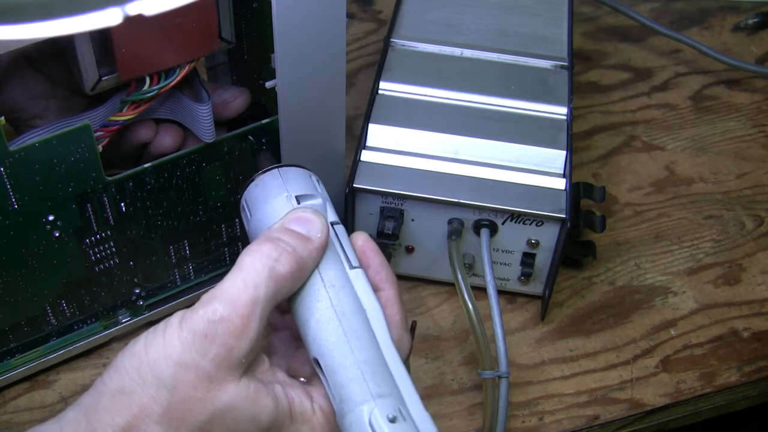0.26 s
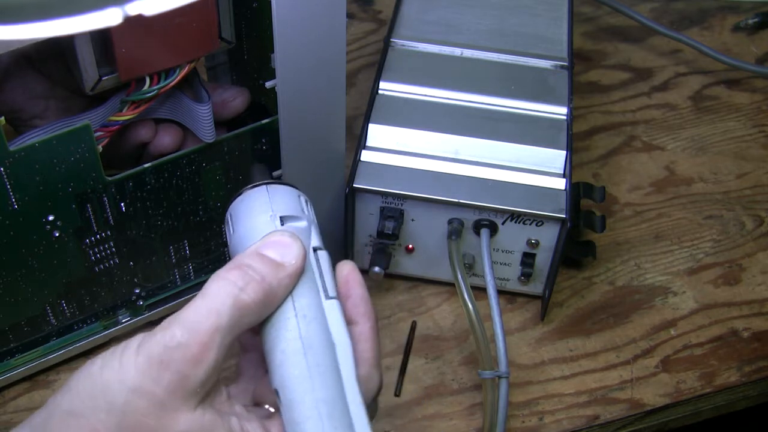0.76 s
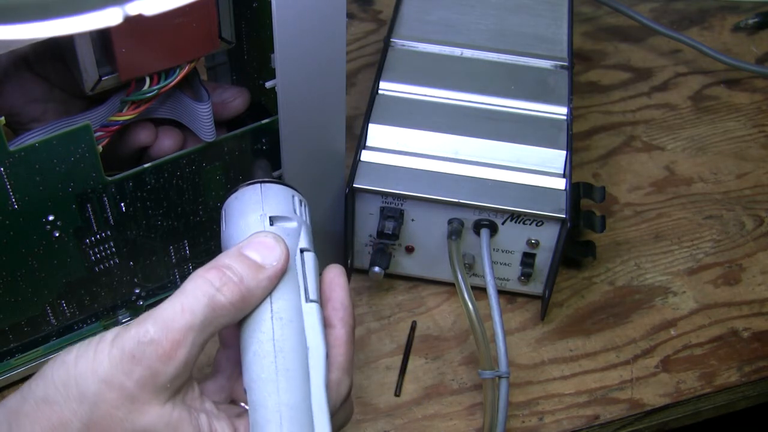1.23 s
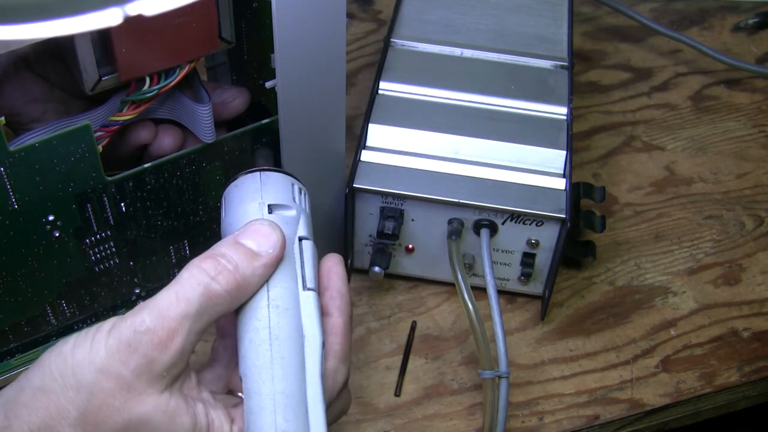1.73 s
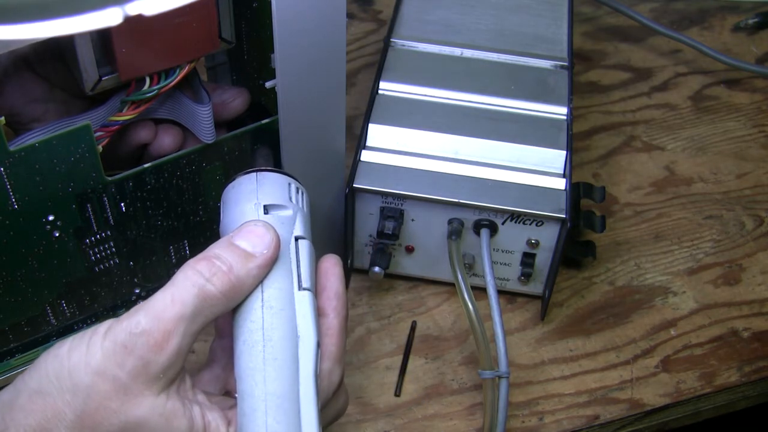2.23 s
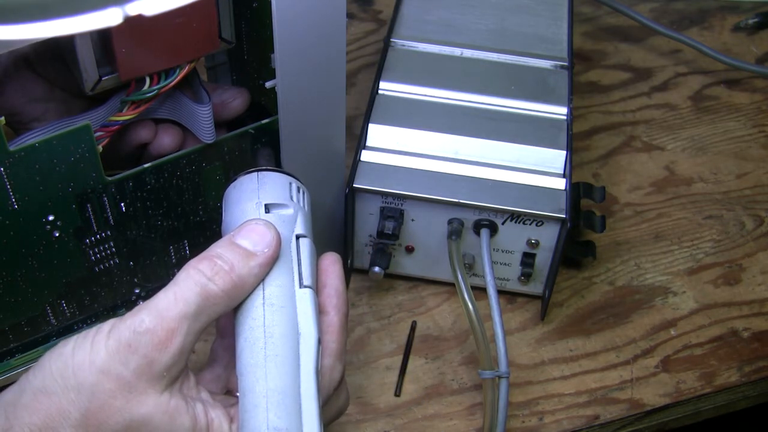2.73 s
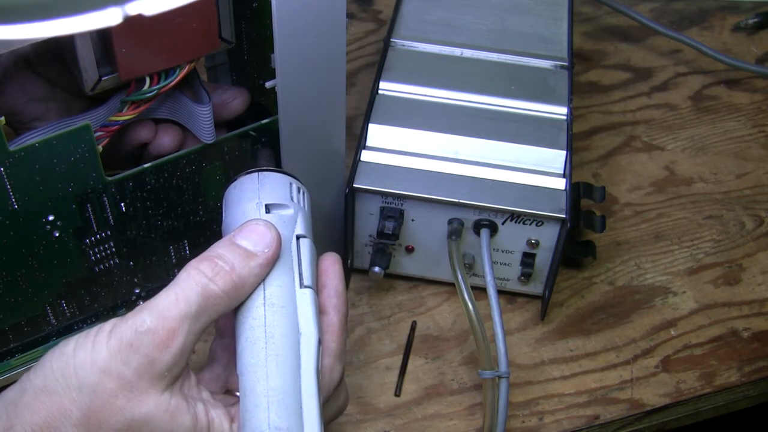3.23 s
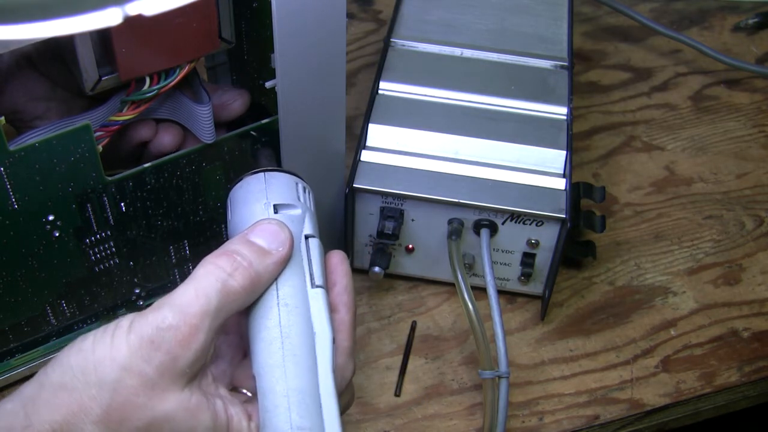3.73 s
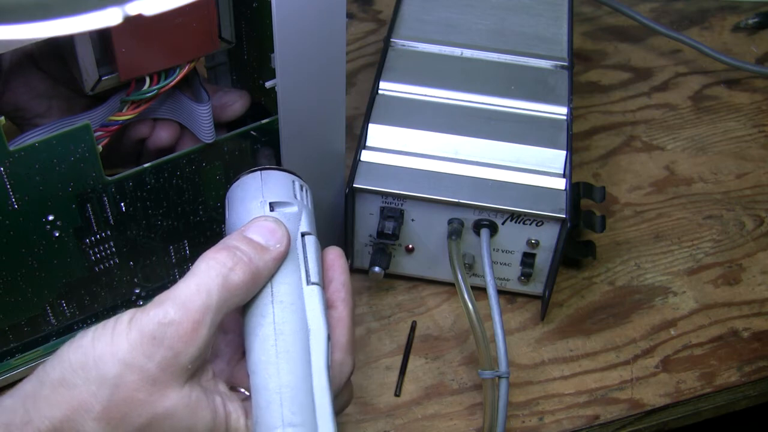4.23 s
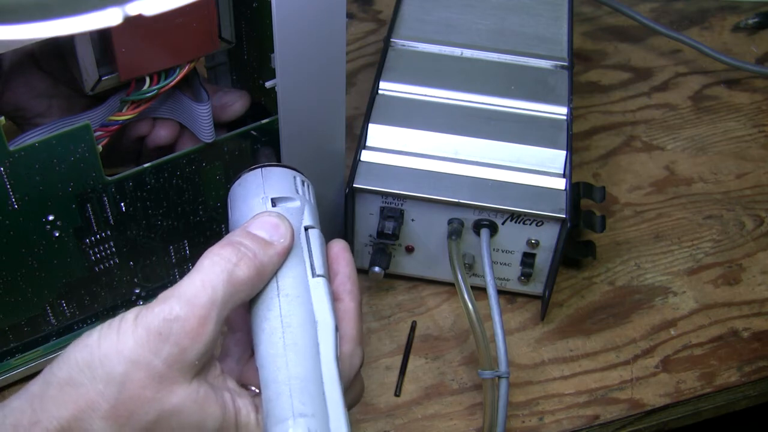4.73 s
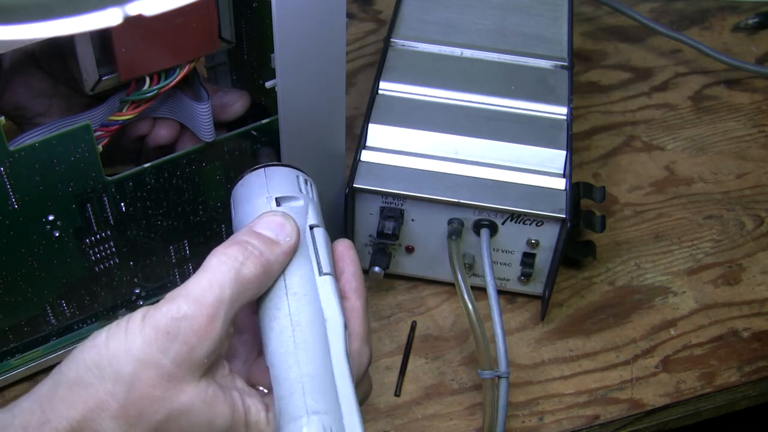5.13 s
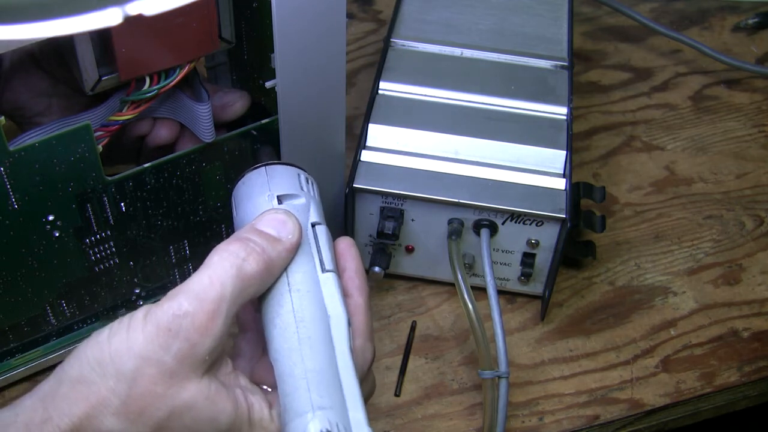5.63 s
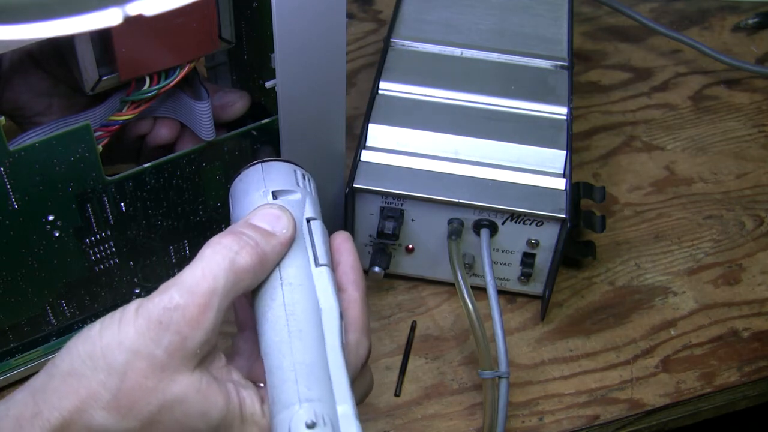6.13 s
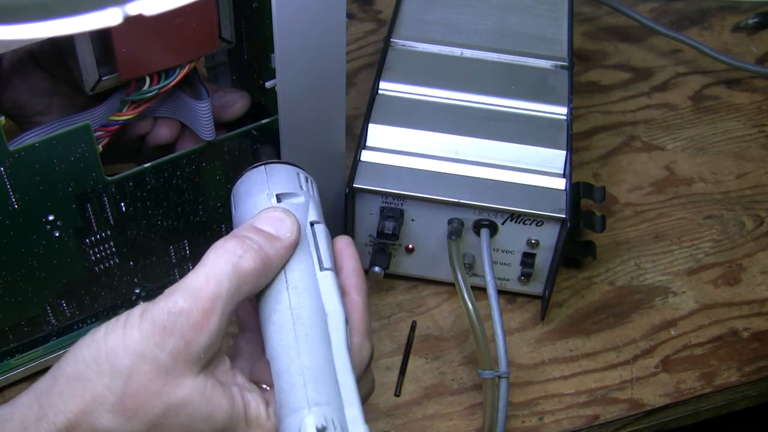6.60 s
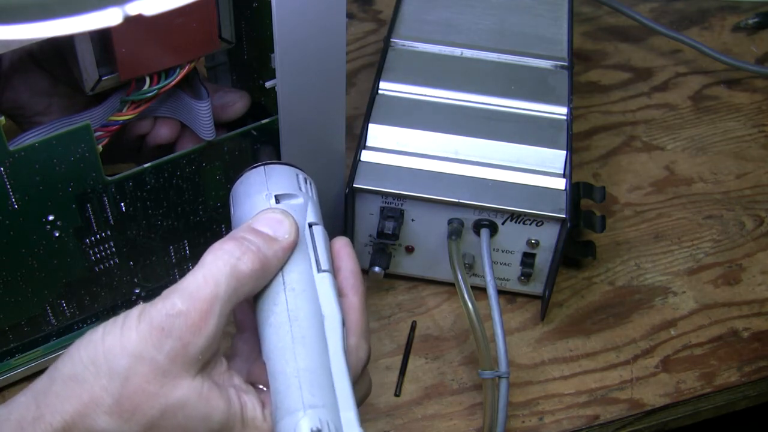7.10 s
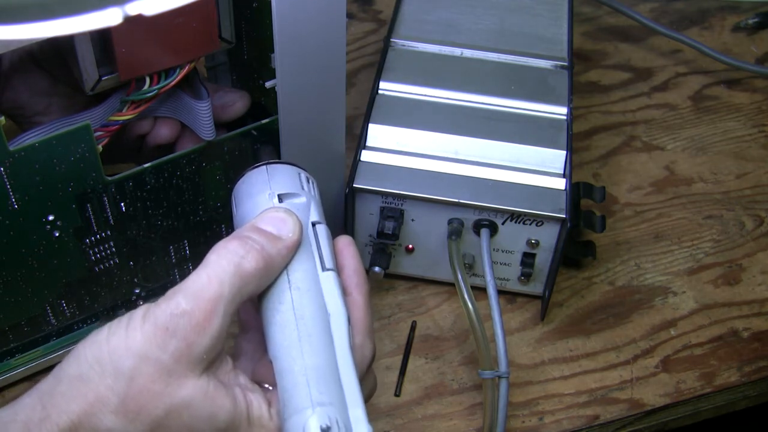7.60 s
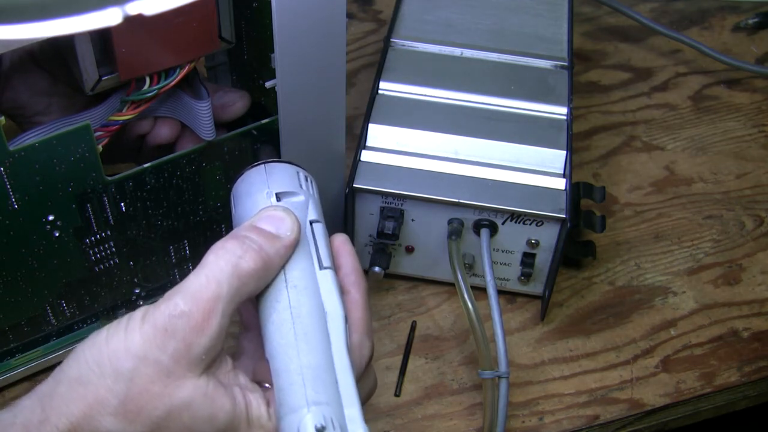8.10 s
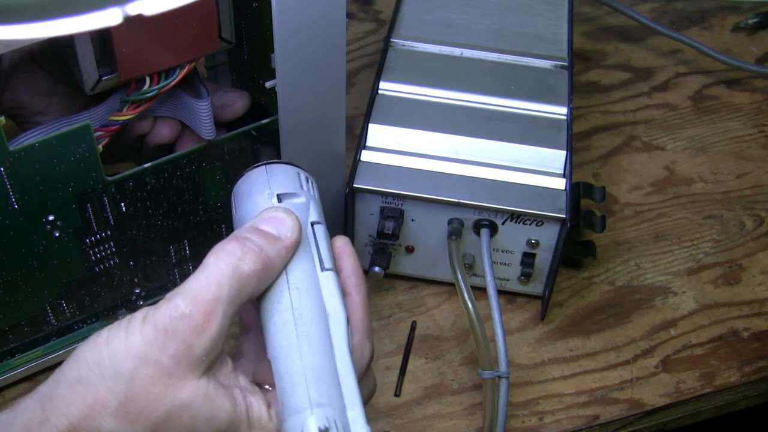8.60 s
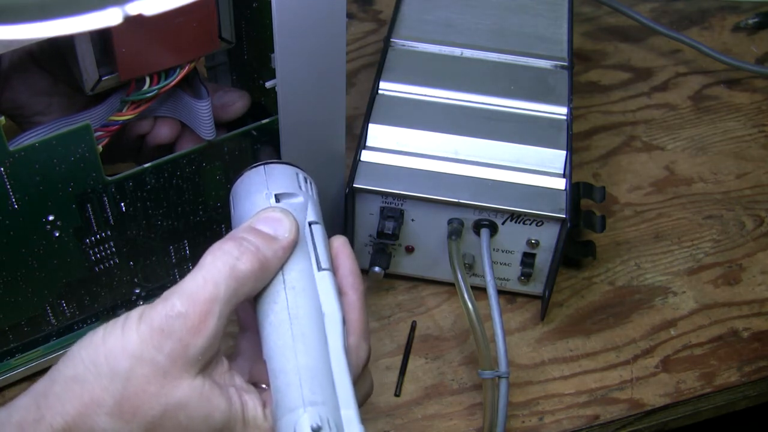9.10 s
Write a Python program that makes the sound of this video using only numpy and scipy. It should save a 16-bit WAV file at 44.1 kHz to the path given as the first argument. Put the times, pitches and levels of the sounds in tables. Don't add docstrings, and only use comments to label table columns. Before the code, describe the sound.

Loud nasal motor buzz with a ringing metal case stops early with a knock and a few slowing puffs. Near the microphone, plastic then clicks and squeaks sparsely under skin, with soft bench bumps, over a low fan wash and light hiss in a small indoor room. After about seven seconds the pump kicks back on at a higher pitch, its loose lid chattering.

```python
import sys
import numpy as np
from scipy import signal
from scipy.io import wavfile
from scipy.ndimage import uniform_filter1d

SR = 44100
rng = np.random.default_rng(int(sys.argv[2]) if len(sys.argv) > 2 else 0)


def pcm_store(signal):
    levels = np.round(np.clip(np.atleast_2d(signal), -1, 1) * 32767)
    wavfile.write(sys.argv[1], SR, levels.astype(np.int16).T)


def elevation(decibels):
    levels = np.asarray(decibels, float)
    return 10 ** (levels / 20)


N = 412335

# [f/Hz, width/Hz, level/dB]
CASE = [(194, 320, -19), (263.3, 9.7, -5), (323, 74, -13.5), (614, 68, -5), (671.8, 23.2, 3.5),
        (845, 52, 1), (915, 15.7, 6), (968.7, 42, -1.5), (1090, 19.6, -5), (1330, 66, -6.5), (1486, 61, -7),
        (1790, 335, -14), (2150, 27, -23)]
# [f/Hz, width/Hz, level/dB]
VALVES = [(2970, 43, -26), (3500, 232, -1), (4144, 130, -3.5), (4530, 154, -7.5), (5153, 91, -2),
          (6010, 206, 1.5), (6650, 920, -8), (7440, 330, -4.5), (7980, 70, -9.5), (8320, 200, -20)]
# [f/Hz, width/Hz, level/dB]
NOZZLE = [(8800, 430, -21), (9020, 70, -13), (9540, 460, -23), (10970, 920, -22), (11660, 200, -22),
          (12430, 230, -20), (12740, 170, -17), (12960, 300, -17), (14300, 400, -24), (15300, 150, -21),
          (15700, 400, -25)]


def evened(x):
    return x / np.sqrt(np.mean(x ** 2) + 1e-20)


def peaked(x, db):
    return elevation(db) * x / abs(x).max()


def add(mix, s, sound):
    at = round(s * SR)
    heard = sound[max(-at, 0):]
    part = mix[max(at, 0):][:len(heard)]
    part += heard[:len(part)]


def filtered(x, order, hz, kind):
    return signal.lfilter(*signal.butter(order, hz, kind, fs=SR), x)


def ringing(modes, size=4096):
    t = np.arange(size) / SR
    out = np.zeros(size)
    for k, (hz, width_hz, db) in enumerate(modes):
        decay = np.exp(-np.pi * width_hz * t)
        out += (-1) ** k * elevation(db) * width_hz * decay * np.sin(2 * np.pi * hz * t)
    return out


def burst(length_s, rise=0.026, count=2000):
    u = np.arange(count) / SR / max(length_s, .0005)
    return rng.standard_normal(count) * (1 - np.exp(-u / rise)) * np.exp(-u)


def drift(count, corner_hz):
    coarse = rng.standard_normal(count // 64 + 700)
    smooth = signal.lfilter(*signal.butter(2, corner_hz, fs=SR / 64), coarse)[690:]
    return evened(np.interp(np.arange(count) / 64, np.arange(len(smooth)), smooth))


def wash(colour, patchy_db):
    frames, hz = N // 256 + 5, np.fft.rfftfreq(1024, 1 / SR)
    a, b, patches = rng.standard_normal((frames, 513, 3)).T
    patches = evened(uniform_filter1d(uniform_filter1d(patches, 8, 0), 14, 1))
    f, db = np.transpose(colour)
    level_db = np.interp(np.log(hz + 1), np.log(f), db)[:, None] + patchy_db * patches
    z = (a + 1j * b) * elevation(level_db)
    return evened(signal.istft(z, nperseg=1024, noverlap=768)[1][:N])


def air_and_hiss():
    # [f/Hz, level/dB per Hz]
    room_colour = [(53, -58), (90, -24), (157, -3), (188, -22), (259, -7.5), (452, -17.5), (534, -15),
                   (799, -22.5), (869, -23.5), (1030, -22.5), (2500, -37.5), (3250, -73), (5500, -120)]
    # [t/s, level/dB]
    room_level = [(0.0, -54), (9.35, -52)]
    # [f/Hz, level/dB per Hz]
    hiss_colour = [(1000, -28), (1800, 0), (3000, -2.5), (6000, -3.5), (9000, -3.5), (13000, -3),
                   (15800, -1.5), (17000, -40)]
    level_db = np.interp(np.arange(N) / SR, *np.transpose(room_level))
    return elevation(level_db) * wash(room_colour, 1.66) + elevation(-61.5) * wash(hiss_colour, 0.4)


def bench_shake():
    # [t/s, peak level/dB]
    swells = [(0.0, -57), (0.15, -55), (0.62, -35.5), (1.28, -56), (2.84, -57), (3.15, -54), (3.73, -54),
              (4.04, -61), (4.35, -57), (4.56, -59), (5.85, -47), (6.03, -63), (6.66, -57), (7.08, -58),
              (7.501, -59), (8.139, -51), (8.83, -60)]
    t = np.arange(N) / SR
    band = signal.butter(2, [18, 95], "bandpass", fs=SR, output="sos")
    shake = evened(signal.sosfilt(band, rng.standard_normal(N)))
    half_width_s = 0.075
    swell = sum(elevation(db) * np.exp(-((t - s) / half_width_s) ** 2) for s, db in swells)
    return (elevation(-56.5 + 2.5 * drift(N, 1.8)) + swell) * shake


def fan_lines():
    # [f/Hz, level/dB]
    fan_tones = [(64.6, -69), (258.4, -57.5), (333.8, -68), (360.7, -65.5), (597.5, -67.5), (888.2, -65.5),
                 (1545, -77), (7854, -85), (7881, -83.5), (11967, -84)]
    out = np.zeros(N)
    for hz, db in fan_tones:
        wander_hz = (1.58 + 0.00201 * hz) * drift(N, 5.72)
        phase = 2 * np.pi * np.cumsum(hz + wander_hz) / SR
        out += np.sqrt(2) * elevation(db + 1.5 * drift(N, 8)) * np.sin(phase)
    return out


def dying_panel():
    hz, db, start_s, t60_s = 813.5, -11.5, -2, 4
    since = np.maximum(np.arange(N) / SR - start_s, 0)
    return elevation(db - 60 * since / t60_s) * np.sin(2 * np.pi * hz * since)


def thump(db, hz, t60_s):
    t = np.arange(8000) / SR
    swing = sum(size * elevation(-60 * ratio * t / t60_s) * np.sin(2 * np.pi * ratio * hz * t)
                for ratio, size in [(.7, 0.46), (1, 1), (1.3, 0.88)])
    return peaked(swing * (1 - np.exp(-t / 0.0035)), db)


def bench_thumps(mix):
    # [t/s, peak level/dB, f/Hz, t60/s]
    knocks = [(0.168, -19.5, 332, 0.023), (0.583, -13.5, 252, 0.13), (0.662, -20.5, 289, 0.14),
              (8.088, -20, 244, 0.33), (1.249, -39, 61.3, 0.099), (1.468, -37.5, 64.6, 0.092),
              (3.249, -37.5, 146, 0.12), (5.814, -22.5, 199, 0.089), (5.861, -35, 194, 0.18),
              (5.991, -35.5, 252, 0.1), (6.247, -45, 143, 0.12), (6.944, -38.5, 196, 0.17),
              (7.178, -35, 140, 0.083), (7.85, -36.5, 137, 0.1)]
    for s, *row in knocks:
        add(mix, s, thump(*row))


def snap(db, hz):
    return peaked(filtered(burst(0.0061, .3), 2, [0.89 * hz, min(1.12 * hz, 15900)], "bandpass"), db)


def skin_snaps(mix):
    # [t/s, peak level/dB, centre f/Hz]
    snaps = [(1.13, -46, 6800), (2.5496, -48, 6700), (6.4037, -55, 10000), (6.5006, -59, 7000),
             (6.6288, -55, 10900), (6.8244, -48, 14000), (6.9167, -56, 7860), (7.0177, -50, 8800),
             (7.7797, -37, 13700), (7.956, -38.5, 13640), (6.8215, -58, 3200), (6.846, -53, 3600),
             (6.849, -52, 2080), (6.9167, -58, 2800), (6.952, -53, 2650), (7.018, -51, 3550),
             (7.019, -50, 2700), (7.168, -52, 2000), (7.336, -51, 3300), (7.342, -49, 2100),
             (7.436, -53, 3400), (7.484, -49, 3450), (7.487, -50, 2500), (7.603, -52, 3400),
             (1.208, -44, 2100), (1.851, -55, 2120), (4.8875, -41, 2400), (4.816, -52, 3600)]
    for s, *row in snaps:
        add(mix, s - .001, snap(*row))


def tick(db, hz, bright_db, top_db, spot_db, length_s, rise):
    # [f/Hz, width/Hz, level/dB]
    handle = [(1110, 170, -1.5), (1330, 43, 5), (1720, 610, -8), (1972, 110, 6.5), (2150, 130, 0.5),
              (2570, 180, 2), (2860, 280, -4.5)]
    # [f/Hz, width/Hz, level/dB]
    button = [(3230, 510, -8.5), (3570, 220, 9), (4250, 1550, -1), (4850, 470, 3), (5600, 4400, -11.5)]
    # [f/Hz, width/Hz, level/dB]
    grip = [(514, 15, 7.5), (670, 61, 5), (795, 120, 5), (862, 94, 2.5)]
    near = [(f, w, level - 8.9 * abs(np.log2(f / hz)) + 2.5 * rng.standard_normal())
            for f, w, level in handle]
    tilt_db = 13.0 * (hz > 3000)
    pressed = [(f, w, level + 2.5 * rng.standard_normal() - tilt_db * abs(np.log2(f / hz)))
               for f, w, level in button]
    contact = burst(length_s, rise)
    contact[8] += 0.26 / max(rise, .03)
    out = np.zeros(3499)
    for modes, level_db in [(near, db - 3.0 + min(-bright_db - 8.5, 0)), (pressed, db + bright_db),
                            (grip, db - 6.0 - 10.8 * np.log2(hz / 1200))]:
        out += peaked(signal.fftconvolve(contact, ringing(modes, size=1500)), level_db)

    rub = burst(0.46 * length_s, rise)
    rub[round(rise * length_s * SR / 2) + 8] += 3.0
    off = abs(np.log2(hz / 1300))
    spot = [(hz, 50 * (hz / 1300) ** 2.1, 0), (1.95 * hz, 80, -4.0 - 22 * off),
            (2.6 * hz, 110, -9.5 - 30 * off)]
    own = signal.fftconvolve(rub, ringing(spot, size=1500))
    out += peaked(own, db + spot_db + min(-bright_db + 3.5, 0))

    edge = filtered(burst(0.43 * length_s, 0.5, count=3499), 2, [5800, 15900], "bandpass")
    return out + peaked(edge, db + top_db)


def handpiece_ticks(mix):
    # [t/s, peak level/dB, strongest ring f/Hz, top over body/dB]
    dull = [(2.304, -56, 1090, 7), (3.0286, -53, 1090, -11), (4.081, -46.5, 1030, -16),
            (4.2968, -31, 1240, -26), (4.3862, -54, 1190, -6), (4.448, -43.5, 1260, -19),
            (4.469, -43, 1230, -20), (4.854, -36, 1060, -31), (5.6784, -49, 1030, -14),
            (5.9995, -50, 1110, -13), (6.775, -46.5, 840, -24), (7.486, -49, 790, -24),
            (7.598, -48, 743, -24), (7.343, -46, 720, -24), (7.4394, -39, 1110, -10),
            (7.448, -44, 2420, -12)]
    ticks = [(1.1307, -46.5, 1110, -8), (2.5485, -54, 1170, -4), (3.6604, -51, 1020, -10),
             (3.854, -48, 1110, -13), (4.2544, -52, 1300, -5), (4.8162, -40, 1280, -21),
             (5.0028, -33, 1280, -11), (5.7828, -38.5, 1400, 0), (5.813, -33.5, 900, -24),
             (6.9503, -42.5, 2190, -18), (7.343, -39.5, 1330, -7), (7.4912, -46, 980, -11),
             (7.6008, -40, 1170, -7), (7.8474, -33.5, 970, -12)]
    rings = [(2.8147, -50, 1010, -11), (6.4829, -52.5, 1330, -6), (6.8487, -49, 1400, -14),
             (7.0176, -44, 1360, -2), (7.181, -39.5, 1330, -22), (7.19, -46, 1330, -22),
             (7.6692, -41, 1330, -9), (7.7771, -36.5, 1330, -3.5), (7.962, -36.5, 1330, -2.5)]
    pings = [(1.207, -35.5, 2150, -13), (1.2418, -48, 2150, -18), (1.851, -54, 2130, -12),
             (3.2483, -46, 2150, -20)]
    taps = [(5.099, -34.5, 2360, -24), (5.9335, -39, 820, -20), (6.2439, -36.5, 2150, -4),
            (8.0405, -17.5, 2100, -13.5)]
    crisp = [(3.786, -40.5, 2570, 7), (3.998, -45, 2570, 4), (4.152, -49, 2600, 0),
             (4.8875, -45.5, 2370, -20), (4.786, -54, 3600, -12), (4.971, -45, 2300, -7),
             (7.4931, -46, 1970, -6)]
    presses = [(4.7476, -34, 3950, -3.5), (5.3265, -50, 3900, -16), (5.8586, -40.5, 4240, 1),
               (5.877, -51, 4000, -15), (5.8952, -46.5, 4000, -15), (6.5318, -53, 4200, -10),
               (6.5697, -41, 4300, -19), (4.971, -44, 3770, -4), (7.4177, -45.5, 4040, -6),
               (7.494, -44.5, 4020, -10)]
    # table, button ring and spot ring over body/dB, slip length/s, rise as a share of it
    kinds = [(dull, -18, -5.5, 0.012, 0.17), (ticks, -7, -5.5, 0.01, 0.072),
             (rings, -8.5, 3.7, 0.0091, 0.55), (pings, -7.5, 2.5, 0.011, 0.057),
             (taps, -7, -6, 0.0041, 0.061), (crisp, 0.1, 0.91, 0.0099, 0.13),
             (presses, 2.3, 3.1, 0.01, 0.028)]
    for table, bright_db, spot_db, length_s, rise in kinds:
        for s, db, hz, top_db in table:
            add(mix, s - .001, tick(db, hz, bright_db, top_db, spot_db, length_s, rise))


def slip(db, rings, rough, length_s, answer_s, answer_db):
    drive = rough * burst(length_s, .05)
    drive[4] += 1
    out = peaked(signal.fftconvolve(drive, ringing(rings[0], size=1500)), db)
    answer = signal.fftconvolve(burst(1.7 * length_s, 0.11), ringing(rings[1], size=1500))
    add(out, answer_s, peaked(answer, db + answer_db))
    return out


def creak(mix, start_s, gap_s, count, db, fade_db, *slip_settings):
    for k in range(count):
        add(mix, start_s + k * gap_s, slip(db + k * fade_db, *slip_settings))


def creaks(mix):
    # [f/Hz, width/Hz, level/dB]
    rasp = ([(1300, 300, 0), (1900, 210, 1), (2450, 450, -1), (4300, 1500, -22)], [(646, 290, 0),
             (950, 150, 1), (1300, 150, 1)])
    scuff = ([(2300, 300, -2), (3700, 200, 2), (4470, 460, -10), (5600, 1000, -14)], [(2300, 300, -8),
              (3680, 250, -2), (1200, 400, 1)])
    groan = ([(845, 180, 1), (1210, 120, 1), (2100, 360, -1), (3800, 900, -26)], [(696, 180, -2),
              (1000, 100, -0.27), (1300, 150, -2)])
    clack = ([(900, 500, -7), (1710, 630, -5), (2530, 220, 5), (3500, 830, -9), (6500, 3000, -23)],
              [(1200, 620, 0), (2100, 500, 0), (3000, 600, -2)])
    flick = ([(1900, 600, -8), (3000, 800, -8), (4150, 350, 2), (6000, 2000, -14), (11000, 5000, -22)],
              [(2000, 700, -6), (3900, 700, 0)])
    creak(mix, 4.4912, .0138, 5, -33, -1, rasp, .12, 0.0039, 0.0041, -1.5)
    creak(mix, 4.7562, .0068, 4, -29, -1.5, scuff, 0.12, 0.0013, .002, -8)
    creak(mix, 4.868, .0055, 2, -33, 4.4, groan, .12, .003, .006, -7)
    add(mix, 5.8118, slip(-25.5, clack, 0.23, 0.0021, .007, -17))
    add(mix, 5.8146, slip(-18.5, clack, 0.032, 0.0061, .008, -18))
    add(mix, .8182, slip(-25.5, flick, 0.25, 0.0014, .003, -9))
    add(mix, .812, slip(-39, rasp, 0.23, 0.0016, .003, -9))


def valve_chugs(mix):
    # [t/s, peak level/dB]
    puffs = [(.584, -35), (.599, -42), (0.61, -33), (0.621, -33), (.636, -36), (0.654, -29), (.676, -36.5),
             (.696, -38), (.707, -47), (.739, -50)]
    for s, db in puffs:
        puff = signal.fftconvolve(burst(0.0022, .3), ringing(VALVES + NOZZLE, size=1500))
        add(mix, s, peaked(puff, db))


def kick(db, hz, treble_db, length_s):
    low = signal.fftconvolve(burst(length_s, 0.97), ringing(CASE + [(hz, 80, 19)]))
    edge = filtered(burst(length_s, count=len(low)), 1, [1800, 9000], "bandpass")
    return peaked(filtered(low, 3, 200, "highpass"), db) + peaked(edge, db + treble_db)


def rotor_kicks(mix):
    # [t/s, peak level/dB, ring f/Hz, treble over body/dB, length/s]
    jerks = [(0.566, -7, 872, -30, 0.0051), (0.584, -21, 900, -18, 0.0023),
             (0.607, -25.5, 1390, -31, 0.0076), (0.628, -30, 1340, -30, 0.0036),
             (0.656, -23, 790, -27, .003), (0.676, -21, 750, -19, 0.0036),
             (0.688, -26.5, 680, -30.5, 0.0089), (0.721, -31, 890, -18, 0.0049),
             (0.751, -29, 676, -28, 0.0042), (0.763, -29, 686, -34, 0.0027), (0.79, -44, 860, -8, 0.01),
             (0.832, -37.5, 850, -10, 0.0084), (8.0463, -10.5, 907, -24, 0.0041),
             (8.113, -13.5, 875, -20, 0.0028), (8.076, -20, 780, -28, 0.0024),
             (8.085, -17.5, 750, -27, 0.0028)]
    for s, *row in jerks:
        add(mix, s - .002, kick(*row))


def lid_chatter(t, x):
    # [t/s, level change/dB]
    flares = [(0.6, 0), (0.655, -16), (8.2, -9), (8.285, -19), (8.306, 7.5), (8.332, -10), (8.352, 8),
              (8.386, -5), (8.414, 7), (8.44, -10), (8.49, 5), (8.54, 1), (8.61, 1), (8.64, -17),
              (8.68, 0.5), (8.753, -3), (8.824, 3.5), (8.886, -11), (8.928, 2), (8.99, 1), (9.05, -3),
              (9.085, 5.5), (9.158, 5.5), (9.196, -13), (9.26, 4.5), (9.329, 3)]
    flare_s, firm_at_s, firm_over_s, firm_db = .013, 8.79, .02, 2.5
    change_db = sum(db * np.exp(-((t - at) / flare_s) ** 2) for at, db in flares)
    change_db += firm_db / (1 + np.exp(np.clip((firm_at_s - t) / firm_over_s, -50, 50)))
    band = signal.filtfilt(*signal.butter(2, [880, 960], "bandpass", fs=SR), x)
    return x + (elevation(change_db) - 1) * band


def stroke_train(turns, slack, orders, run_hz, response, flutter_db, lead, spread, loose):
    out = np.zeros(len(turns))
    for k, db in orders:
        spin = np.exp(-2j * np.pi * k * run_hz * np.arange(len(response)) / SR)
        through = response @ spin
        level_db = db + flutter_db * np.sqrt(k) * drift(len(turns), 6) - 3.9 * loose * k * slack
        phase = 2 * np.pi * k * turns - np.angle(through) + lead + spread * k ** 2
        out += elevation(level_db) / abs(through) * np.cos(phase)
    return out


def pump(speed, effort, air_law, orders, run_hz, steady_s, jitter, flutter_db, lead, spread,
         loose, knock, puff, puff_at):
    # [f/Hz, width/Hz, level/dB]
    mount = [(242, 63, -4.5), (687.4, 33.6, -0.5), (939, 17, -1)]
    # [f/Hz, width/Hz, level/dB]
    leak = [(8150, 570, -4.5), (12260, 990, -4.5), (14900, 700, -7)]
    s, db = np.transpose(effort)
    t = np.arange(s[0], s[-1], 1 / SR)
    still = (t > steady_s[0]) & (t < steady_s[1])
    body_db = np.interp(t, s, db)
    full_db, valve_db, follow, choke, rattle, growth = air_law
    lost_db = full_db - body_db
    hiss_db = valve_db - follow * lost_db - choke * np.maximum(lost_db - 31, 0)

    rate = np.interp(t, *np.transpose(speed))
    slack = np.maximum(.97 - rate / run_hz, 0)
    rattle = np.clip(rattle + growth * (t - s[0]) + loose * slack, 0, 1)
    turns = np.cumsum(rate * (1 + (jitter + 0.17 * slack) * drift(len(t), 40))) / SR

    case, valves = ringing(CASE), ringing(VALVES + NOZZLE)
    case = filtered(case, 3, 130, "highpass")
    both = case + 0.15 * valves + ringing(mount)
    strokes = stroke_train(turns, slack, orders, run_hz, both, flutter_db, lead, spread, loose)

    vane_air, valve_air, knock_size, leak_air = rng.standard_normal((4, len(t)))
    gate = 1 + (puff + 0.22 * slack) * np.cos(2 * np.pi * (turns - puff_at))
    once = np.diff(np.floor(turns), prepend=0)
    knocks = once * np.clip(knock_size, -1.7, 1.7) * np.sqrt(SR / rate)
    loose_air = gate * vane_air + knock * knocks
    dull = filtered(loose_air, 2, 1160, "lowpass")
    loose_air = loose_air + np.clip(1.54 * slack, 0, 1) * (dull - loose_air)

    out = np.zeros(len(t) + 4095)
    for drive, response, level_db, share in [(strokes, both, body_db, np.sqrt(1 - rattle)),
                                             (loose_air, case, body_db, np.sqrt(rattle)),
                                             (gate ** 2 * valve_air, valves, hiss_db, 1),
                                             (gate * leak_air, ringing(leak), hiss_db - 15, 1)]:
        scale = np.std(signal.oaconvolve(drive[still], response, "same"))
        out += signal.oaconvolve(drive * elevation(level_db) * share, response) / scale
    return s[0], lid_chatter(s[0] + np.arange(len(out)) / SR, out)


def coasting_pump(mix):
    # [t/s, rate/strokes per s]
    hold_speed = [(-.1, 158.8), (.55, 160)]
    # [t/s, rate/strokes per s]
    coast_speed = [(0.574, 132), (0.601, 108), (.64, 73), (0.679, 70), (.8, 26)]
    # [t/s, body level/dB]
    effort = [(-.1, -13), (.3, -13), (.575, -13), (.6, -15.5), (.645, -24), (.668, -27), (.69, -36.5),
              (.715, -45), (0.801, -50)]
    air_law = (-13, -35.5, .75, .6, .03, .001)
    # [multiple, level/dB]
    orders = [(1, -11.5), (2, -5), (3, -17), (4, -4.5), (5, -0.5), (6, 1.5), (7, -24.5), (8, -7.5),
              (9, -24.5), (10, -14.5), (11, -22.5), (12, -19), (13, -23.5), (14, -38), (15, -36), (16, -30),
              (17, -30.5), (18, -54), (19, -28.5), (20, -39), (21, -33), (22, -19), (23, -24), (24, -38),
              (25, -25), (26, -24), (27, -42), (28, -32), (29, -32), (32, -36), (34, -34.5), (37, -30),
              (38, -28.5), (42, -42), (47, -48)]
    add(mix, *pump(hold_speed + coast_speed, effort, air_law, orders, run_hz=160.7, steady_s=(0, .5),
                   jitter=.0006, flutter_db=0.053, lead=-.6, spread=-1.27,
                   loose=2.2, knock=0.42, puff=0.18, puff_at=0.21))


def starting_pump(mix):
    # [t/s, rate/strokes per s]
    start_speed = [(8.04, 90), (8.055, 122.5), (8.09, 130), (8.116, 167), (8.136, 173), (8.15, 181.5)]
    # [t/s, rate/strokes per s]
    run_speed = [(8.209, 184.3), (8.298, 187.4), (8.4, 184.4), (8.461, 186.7), (8.76, 185.4), (8.82, 184.2),
                 (8.95, 181.7), (9.063, 182.7), (9.243, 183.5), (9.4, 182.2)]
    # [t/s, body level/dB]
    effort = [(8.05, -21), (8.066, -30), (8.085, -26), (8.104, -24), (8.114, -15), (8.14, -14.5),
              (8.194, -15), (8.23, -14), (9.4, -15)]
    air_law = (-14.3, -28.8, 1.55, 0, .12, .27)
    # [multiple, level/dB]
    orders = [(1, -7), (2, 0.5), (3, -2), (4, -1.5), (5, -4), (6, -14), (7, -3), (8, -11), (9, -18),
              (10, -18), (11, -23), (12, -29)]
    add(mix, *pump(start_speed + run_speed, effort, air_law, orders, run_hz=185.5, steady_s=(8.25, 9.3),
                   jitter=.002, flutter_db=.55, lead=1.85, spread=.99,
                   loose=1.0, knock=0.33, puff=0.13, puff_at=0.47))


def scene():
    mix = air_and_hiss() + bench_shake() + fan_lines() + dying_panel()
    for source in (bench_thumps, skin_snaps, handpiece_ticks, creaks,
                   valve_chugs, rotor_kicks, coasting_pump, starting_pump):
        source(mix)
    return mix[None]


def low_pass(x):
    return signal.sosfilt(signal.butter(12, 15800, fs=SR, output="sos"), x)


def record(dry):
    lowpass = signal.firwin(401, 15880, window=("kaiser", 9), fs=SR)
    mix = signal.oaconvolve(dry, lowpass[None], "same")
    return low_pass(mix)


dry = scene()
out = record(dry)
pcm_store(out)
```